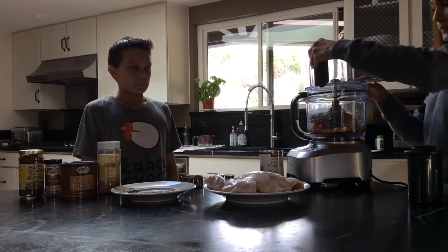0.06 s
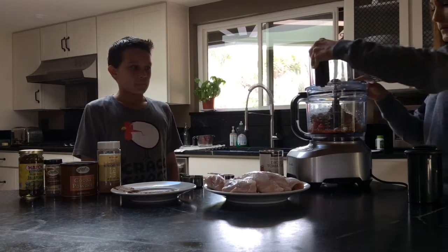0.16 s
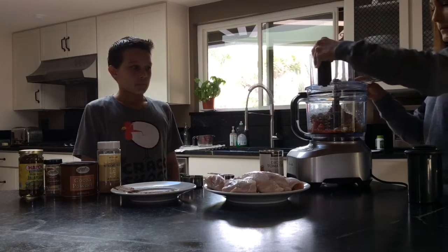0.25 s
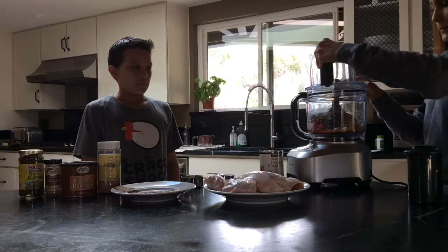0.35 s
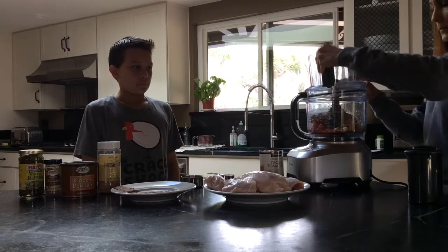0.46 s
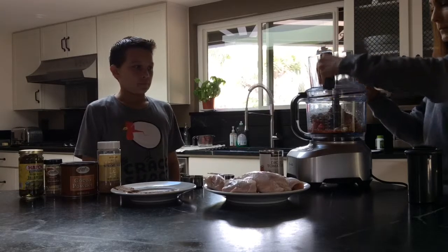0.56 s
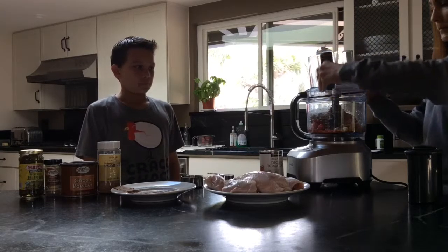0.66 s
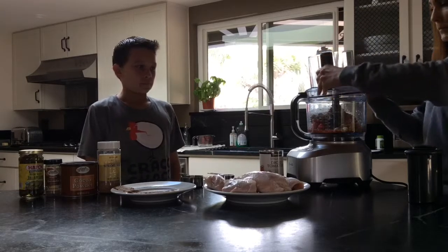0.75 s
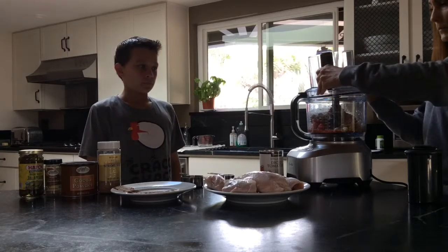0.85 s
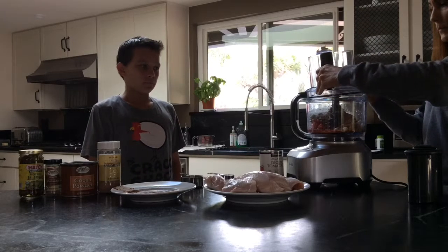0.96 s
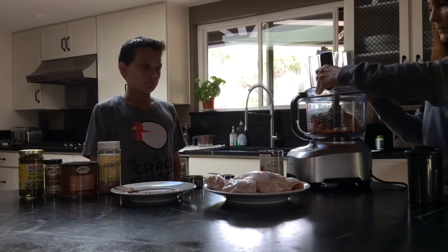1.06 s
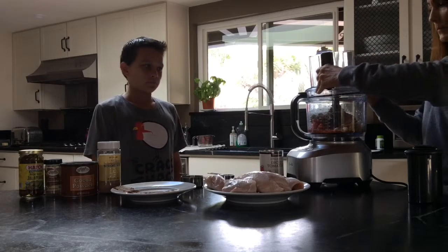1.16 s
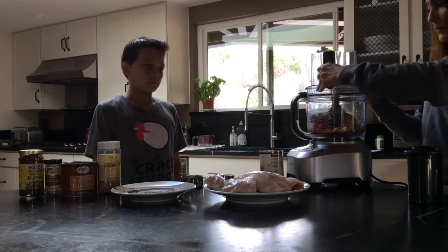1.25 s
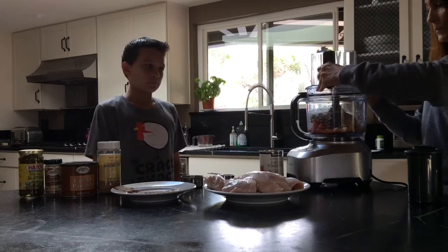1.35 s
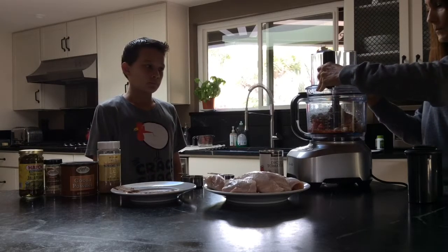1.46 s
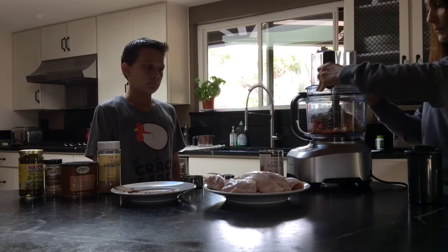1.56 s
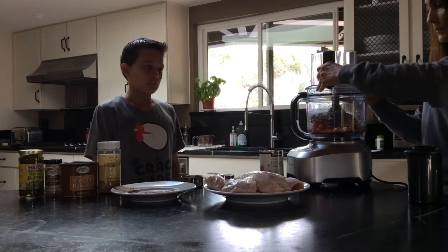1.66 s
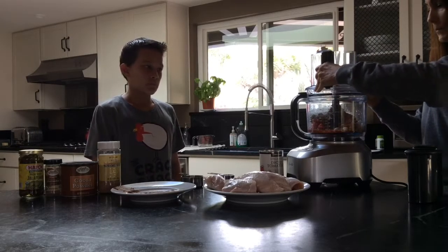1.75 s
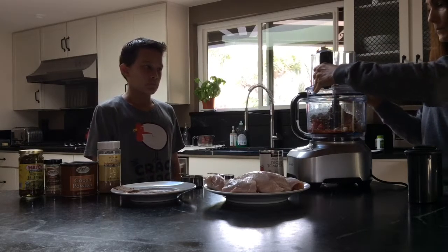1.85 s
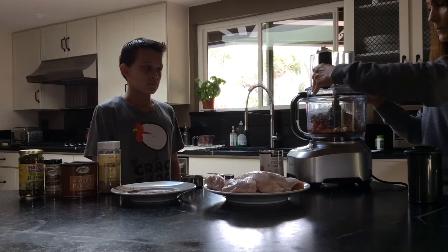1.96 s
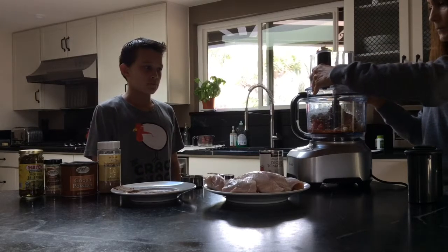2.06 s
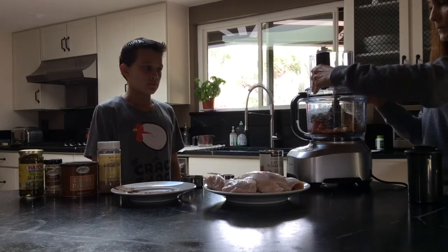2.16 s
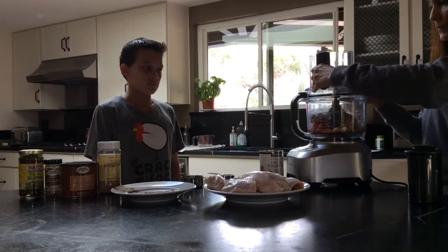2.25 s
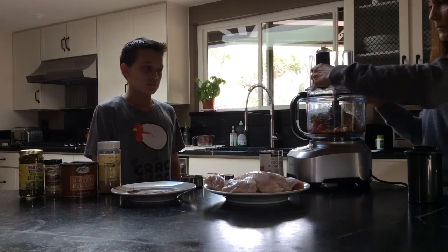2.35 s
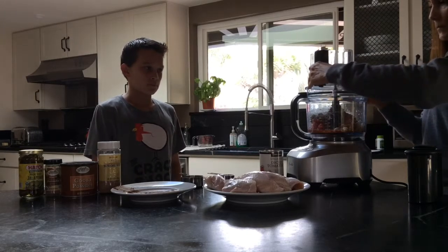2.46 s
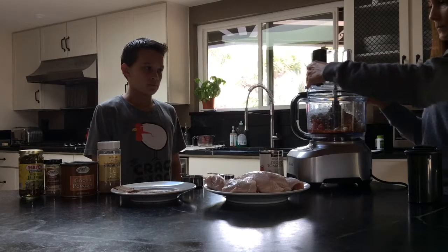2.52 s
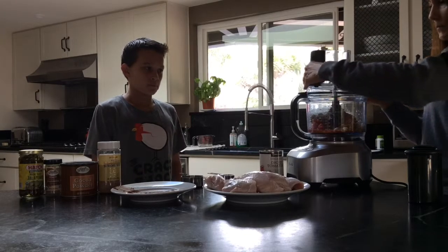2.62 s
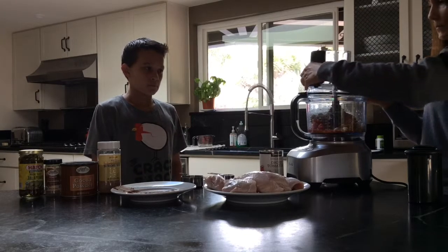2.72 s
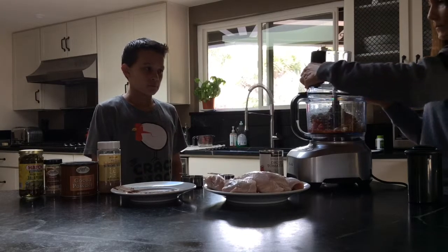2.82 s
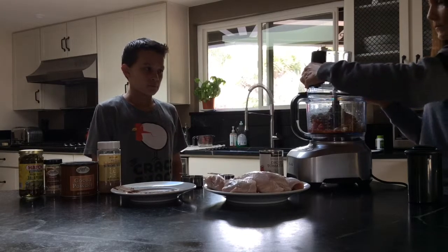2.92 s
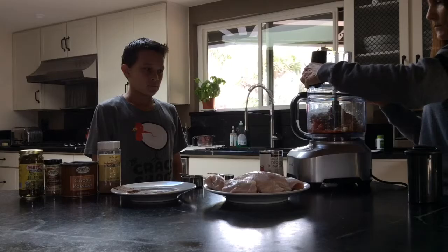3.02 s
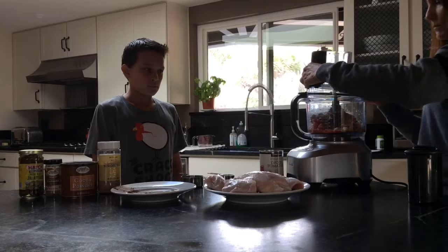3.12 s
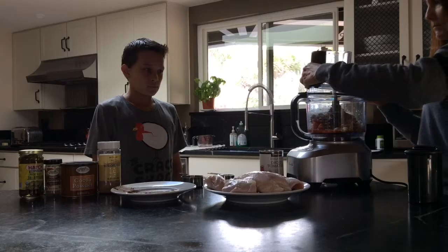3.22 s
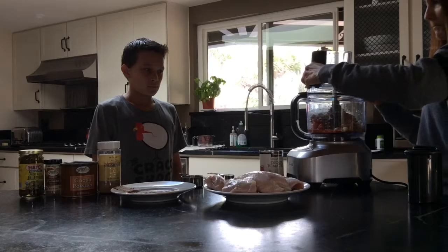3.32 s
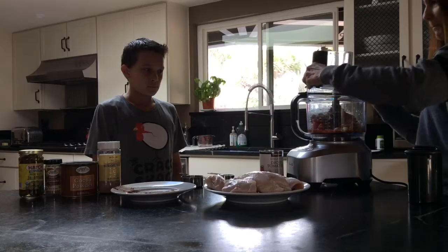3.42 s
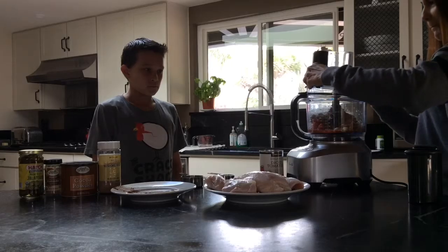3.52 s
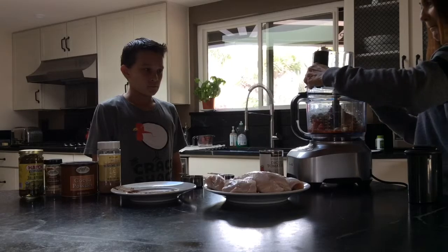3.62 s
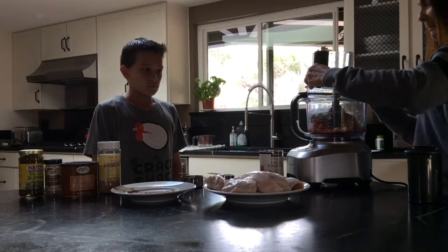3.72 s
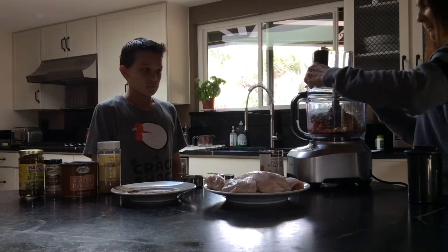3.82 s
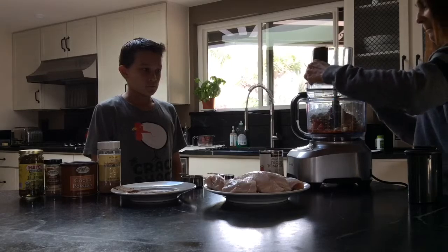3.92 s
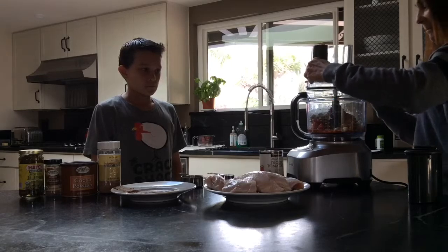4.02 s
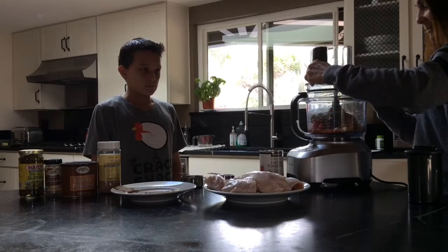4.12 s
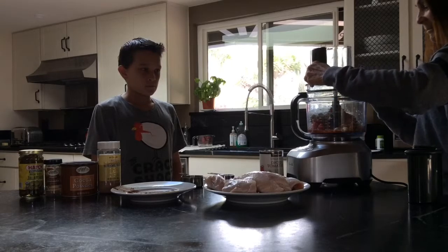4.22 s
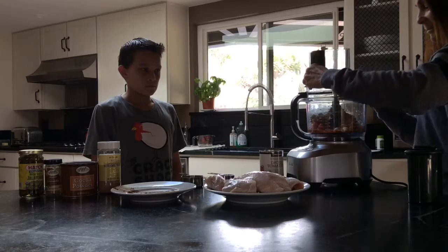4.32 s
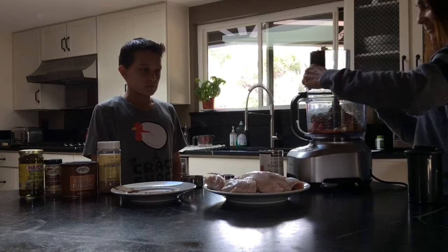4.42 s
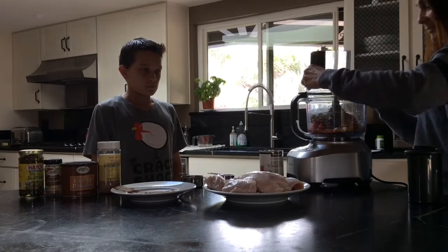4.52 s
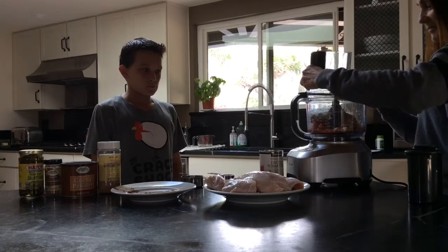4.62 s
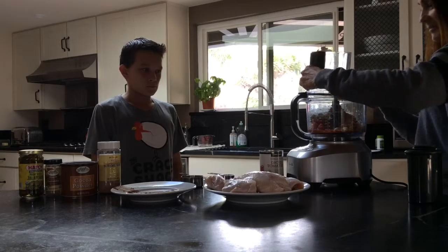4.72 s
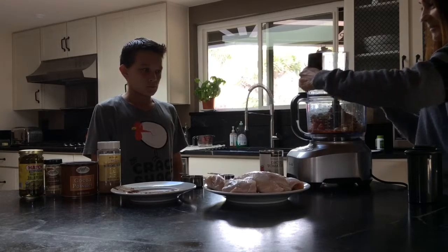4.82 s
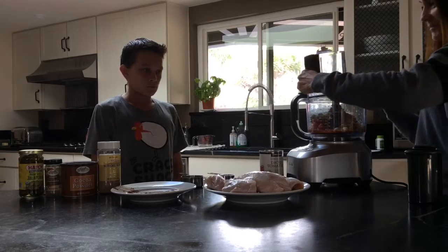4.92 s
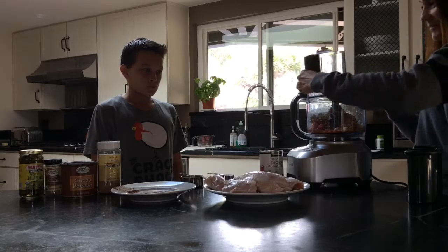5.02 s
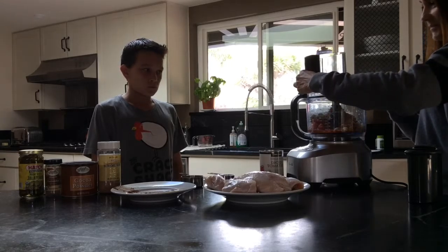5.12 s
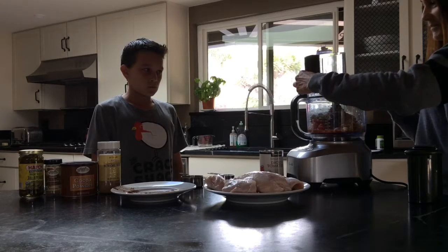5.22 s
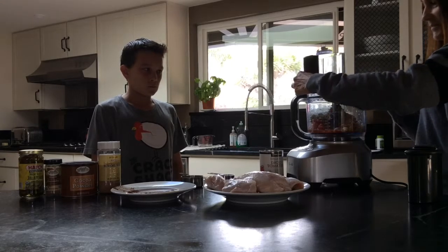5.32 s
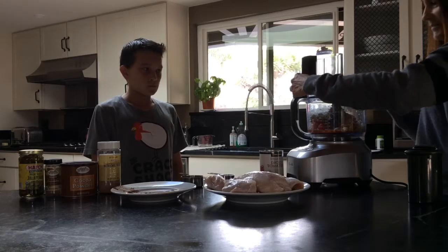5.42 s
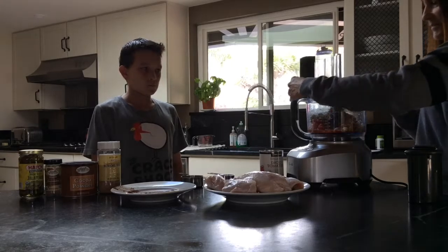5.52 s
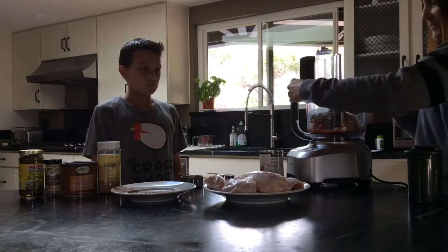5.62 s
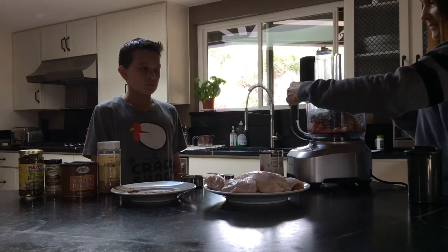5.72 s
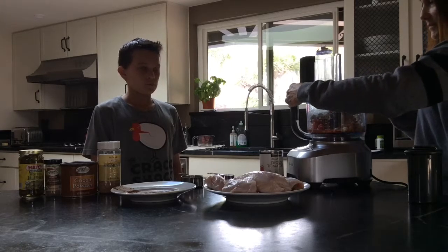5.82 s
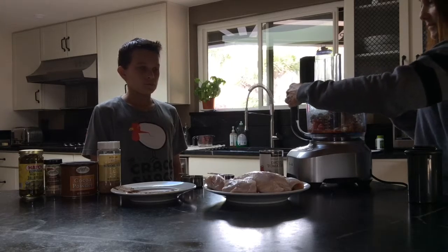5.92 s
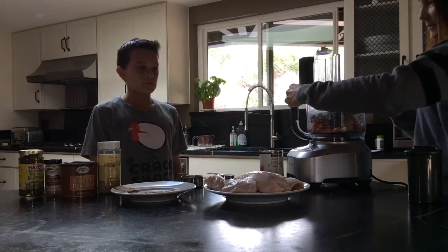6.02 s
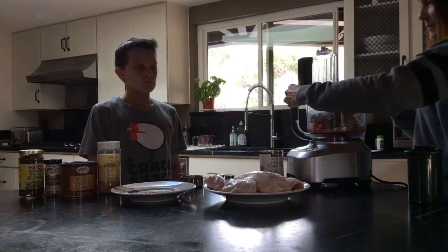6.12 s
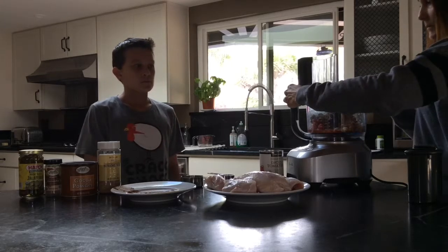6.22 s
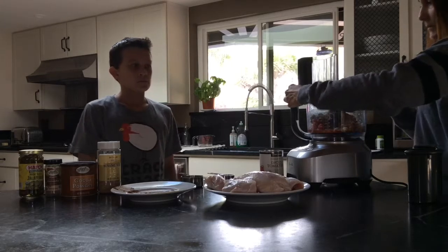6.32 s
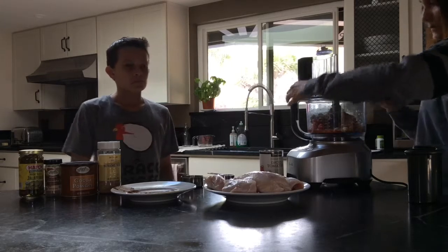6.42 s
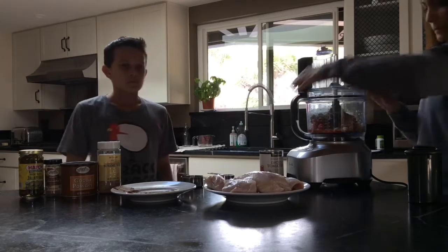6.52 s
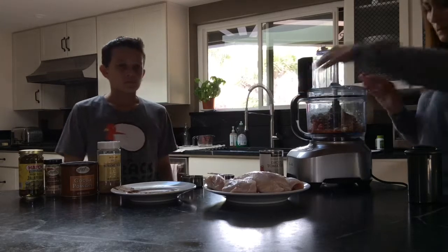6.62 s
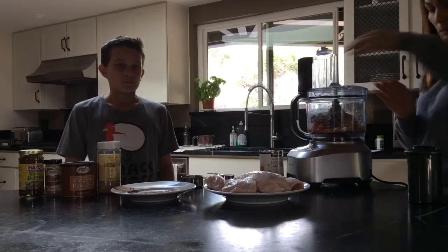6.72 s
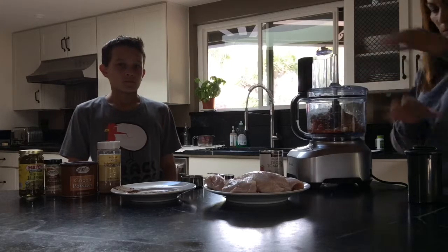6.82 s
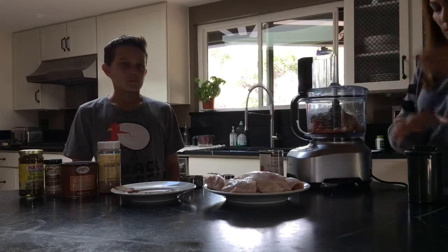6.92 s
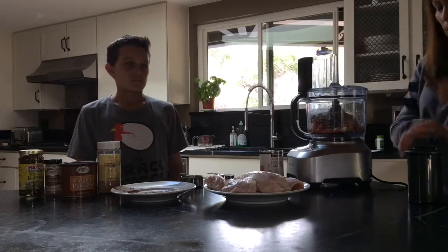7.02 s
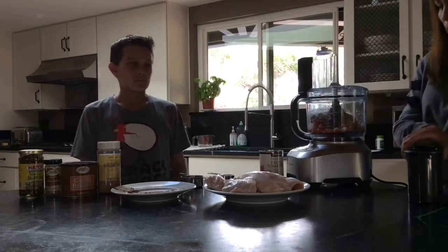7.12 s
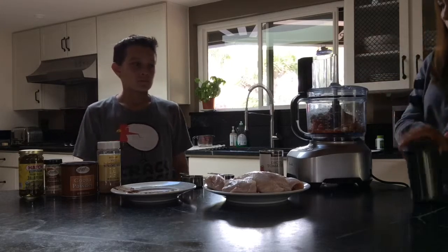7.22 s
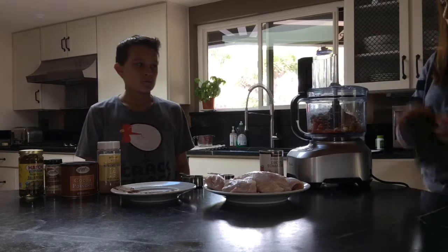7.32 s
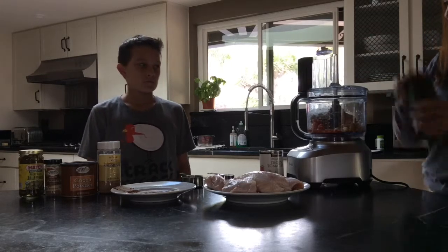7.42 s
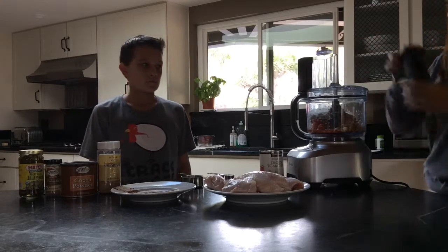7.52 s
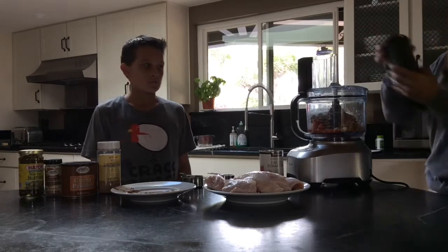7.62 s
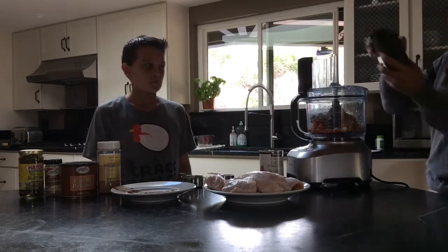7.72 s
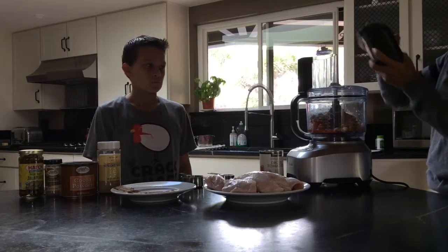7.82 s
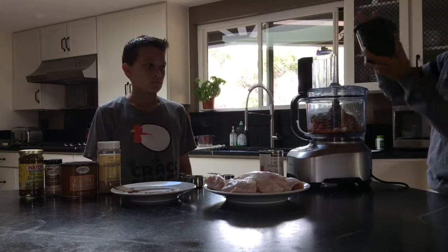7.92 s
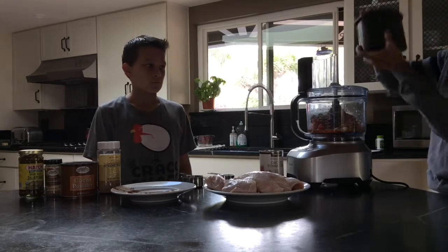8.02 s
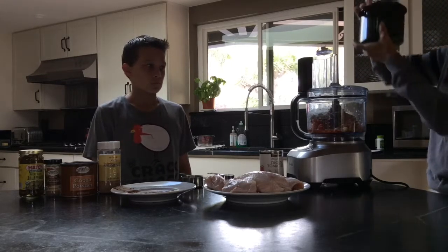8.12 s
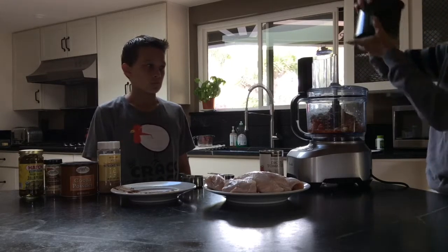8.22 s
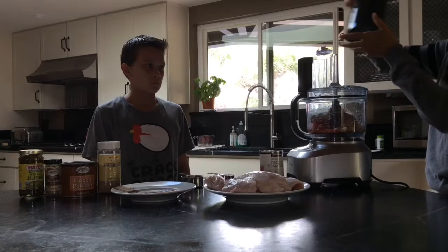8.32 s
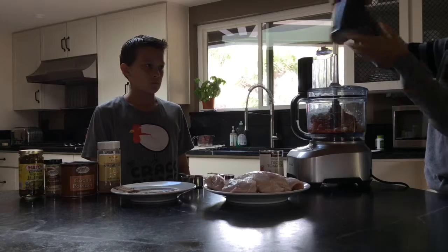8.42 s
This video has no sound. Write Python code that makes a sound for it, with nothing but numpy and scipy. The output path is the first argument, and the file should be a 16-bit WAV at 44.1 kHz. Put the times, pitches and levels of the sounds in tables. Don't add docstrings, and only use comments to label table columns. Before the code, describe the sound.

Hard plastic knocks and sharp clicks as a food processor lid and pusher are fitted, twisted and latched in a lively kitchen over faint low hum.

```python
import sys
import numpy as np
from scipy import signal
from scipy.fft import rfft, irfft
from scipy.io import wavfile
from scipy.ndimage import uniform_filter1d

SR = 44100
rng = np.random.default_rng(int(sys.argv[2]) if len(sys.argv) > 2 else 0)


def generate_wav(signal):
    frames = np.transpose(np.atleast_2d(signal))
    scaled = np.clip(frames, -1, 1) * 32767
    pcm = np.round(scaled).astype(np.int16)
    wavfile.write(sys.argv[1], SR, pcm)


def nominal_scale(level):
    x = np.asarray(level, float) / 20
    return 10 ** x


N = 373086

# pitch_hz, level_db
HUM_TONES = [(40, -82), (58.7, -70), (160, -75.5), (180, -73.5)]
# time_s, level_db
FAN_LEVEL = [(0, -80), (.25, -63), (3, -64.5), (7.3, -64.5), (7.6, -79), (8.46, -65)]
FAN_HZ = 80.2
# freq_hz, density_db_per_hz
AIR_SPECTRUM = [(20, -36), (45, -23), (90, -13), (170, -9), (230, -15), (420, -19.5), (830, -26.5),
                (1250, -32.5), (2600, -37), (6500, -38.5), (8300, -35.5), (9800, -36.5), (12500, -43.5),
                (15500, -49.5)]
# start_s, level_db, pitch_hz, t60_ms
BOWL_KNOCKS = [(0.026, -41, 436, 46), (0.656, -19, 277, 35), (1.009, -49, 268, 84), (1.288, -48.5, 251, 74),
               (1.793, -50.5, 268, 96), (1.895, -28, 463, 25), (1.907, -35, 347, 115),
               (2.455, -48, 276, 71), (2.492, -40, 270, 85), (2.678, -44.5, 302, 110),
               (2.708, -35.5, 305, 66), (2.72, -23.5, 308, 19), (3.604, -41, 263, 38),
               (3.947, -52, 283, 53), (4.058, -53, 356, 145), (4.482, -21, 339.5, 57),
               (4.481, -24.5, 332, 120), (4.81, -38.5, 255, 78), (4.96, -36, 279.4, 200),
               (4.972, -34, 275.5, 160), (5.021, -42, 250, 67), (5.22, -38.5, 334, 34),
               (5.437, -41.5, 340, 44), (5.556, -23.5, 239.3, 270), (5.564, -16.5, 237.4, 165),
               (5.586, -21.5, 250, 27), (5.618, -23, 214, 50), (5.673, -28, 235, 35),
               (6.191, -41.5, 225, 64), (6.247, -24.5, 350, 15)]
# pitch_ratio, level_db
SHELL_MODES = [(1.006, 4.5), (1.235, -7), (0.89, -19.5)]
# start_s, level_db, pitch_hz
TUBE_KNOCKS = [(0.6604, -17.5, 527), (0.656, -19.5, 823), (0.66, -31.5, 1440), (1.793, -48.5, 510),
               (1.895, -32, 694), (1.908, -34, 850), (2.491, -44.5, 537), (2.678, -48, 501),
               (2.708, -42, 497), (2.72, -32, 613), (3.234, -51, 514), (3.604, -47.5, 1050),
               (4.446, -52, 685), (4.481, -31, 620), (4.598, -58, 510), (4.81, -40.5, 562),
               (4.972, -36.5, 780), (5.021, -32, 1313), (5.22, -43, 818), (5.437, -43.5, 565),
               (5.51, -32, 843), (5.556, -25.5, 554), (5.564, -21.5, 893), (5.585, -33.5, 1125),
               (5.618, -31, 1037), (6.191, -49.5, 790), (6.247, -24, 588), (7.355, -24.5, 595),
               (7.611, -45, 496), (8.185, -43, 534)]
# pitch_ratio, level_db
TUBE_MODES = [(0.9445, 6), (1.356, 3.5), (0.775, -2), (1.72, -16)]
# centre_hz, t60_s, level_db
ROOM_BANDS = [(78.6, 0.58, 2.5), (120, 0.41, -9.5), (274, 0.42, 0), (493, 0.51, -2), (986, 0.51, 2.5),
              (2000, .5, -1), (4000, 0.49, 3), (8500, 0.44, 1), (14150, 0.37, 1)]
# delay_ms, level_db
ROOM_ECHOES = [(3.6, -3), (7.9, -11), (10.5, 1), (17, -10)]
# time_s, level_db
ROOM_SHARE = [(0, -13.5), (.8, -4.5), (1.2, -7), (1.9, -5.5), (2.5, -5.5), (2.901, -4.5), (3.6, -7.5),
              (4.1, 1), (4.5, -4.5), (4.8, -2.5), (5.0, -3), (5.6, -4), (6.2, -2), (7.35, -10.5),
              (7.6, -5.5), (8.2, -6.5)]
# start_s, level_db, pitch_hz
THUDS = [(.604, -48.5, 166), (.657, -57, 172), (0.701, -46.5, 89), (1.895, -38.5, 177), (2.493, -50, 162),
         (2.999, -55, 166), (5.51, -39.5, 187), (5.565, -32.5, 170), (5.6, -46, 106)]
THUD_T60_CYCLES = 9.8
# start_s, level_db, length_ms, centre_hz
RUBS = [(0.648, -64, 9.9, 2470), (7.346, -64.5, 12, 3000), (1.885, -64, 11, 2000), (2.6, -79, 270, 1400),
        (8.21, -73.5, 36, 3200), (4.02, -78.5, 50, 3000), (5.199, -74.5, 33, 5050), (6.176, -74, 58, 2330),
        (6.71, -77.5, 27, 6200), (7.57, -69, 54, 6700), (7.751, -69.5, 34, 4500), (7.867, -66.5, 30, 6740),
        (8.258, -76, 78, 5900), (8.348, -66.5, 36, 4000)]
# centre_hz, width_hz, gain_db
EDGE_MODES = [(1724, 650, 5), (3400, 650, 5), (5530, 2100, 4.5), (7950, 380, 6.5)]
CRACK_HZ = [600, 1800, 4200, 9000, 16000]
# start_s, body_db,
# hardness_db
EDGE_HITS = [(0.6567, -18, -2.5), (0.6594, -34, 2.5), (1.0096, -47, -19), (1.287, -46, -8),
             (1.667, -65, -28), (1.795, -47, -24), (1.8934, -27, 0.5), (2.492, -43, -2),
             (2.7085, -42.5, -0.5), (2.7227, -36.5, -6.5), (2.9099, -65.5, 13.5), (2.9985, -53, -0.5),
             (3.237, -53.5, -9), (3.6034, -49, -18), (3.9494, -58.5, -12), (4.0594, -45, 1),
             (4.4491, -46.5, -2.5), (4.485, -34, -6.5),
             (4.811, -43.5, -23), (4.957, -37, -17), (4.9623, -39, 1.5), (5.02, -30.5, -2),
                (5.2016, -49, -5.5), (5.219, -45.5, -3.5), (5.2503, -51, 3.5), (5.432, -56.5, -2),
                (5.5114, -43, -4.5), (5.5538, -36.5, -6.5), (5.5631, -16.5, -11), (5.5715, -28, -8.5),
                (5.5866, -27, -3.5), (5.6196, -26.5, -9), (6.044, -61.5, -5), (6.196, -37.5, -13),
                (7.3549, -36, 7.5), (7.3577, -27, -8), (8.1864, -44.5, -12)]
# start_s, body_db, hardness_db, chatter_ms
LATCH_HIT = (6.2406, -21.5, 1, 5.2)
CHATTER_MS = 5.54
TOP_DB, TOP_DB_PER_HARD_DB = -3.5, 1.34
# start_s, level_db
PUSHER_MODES = [(445, -9, 0.096), (818, -7, 0.027)]
PUSHER_HITS = [(1.895, -50)]
HUB_MODES = [(1145, -4, 0.21), (1196, -2, 0.14), (1215, -4, 0.36)]
HUB_HITS = [(2.579, -67), (3.603, -55.5), (4.062, -61), (4.81, -62), (5.021, -44), (5.221, -72)]
DOME_MODES = [(653, -10, .19), (830, -3, 0.38)]
DOME_HITS = [(4.062, -71.5), (5.22, -58)]
RIM_MODES = [(1010, -17, 0.045), (1840, -10, .07)]
RIM_HITS = [(4.958, -44), (5.021, -49.5)]
COLLAR_MODES = [(590, 4, 0.054), (800, -16, 0.063)]
COLLAR_HITS = [(5.565, -36), (5.62, -43)]
CATCH_MODES = [(510, -9.5, 0.034), (950, -6, 0.044), (1198, -4.5, 0.11), (1800, -8, 0.17), (5850, -1, 0.01),
               (7620, -4, 0.033)]
CATCH_HITS = [(6.243, -35.5)]
JAR_MODES = [(463, -1, 0.17), (620, 9.5, 0.093), (884, -11, 0.11), (1400, -2.5, 0.034)]
JAR_HITS = [(7.356, -31.5), (7.612, -64), (8.186, -54)]
# start_s, level_db
BLADE_JOLTS = [(2.7233, -60.5), (4.483, -58.5), (5.517, -65), (5.5621, -35.5)]
# pitch_hz, level_db, t60_s
BLADE_MODES = [(790, -19, .3), (1150, -16, 0.81), (1300, -16, 0.56), (1222, 3, 0.32), (1263, -6, 0.67),
               (1730, -9, 0.25)]
FLUTTER_DB = 2.5


def level(x, db):
    return x * nominal_scale(db) / np.sqrt(np.mean(x ** 2))


def band(x, hz, width_hz):
    return signal.lfilter(*signal.iirpeak(hz, hz / width_hz, SR), x)


def add(track, start_s, sound):
    i = int(start_s * SR)
    track[i:i + len(sound)] += sound[:N - i]


def ring(modes, push_ms, length_s):
    t = np.arange(int(length_s * SR)) / SR
    y = sum(nominal_scale(db) * np.sin(2 * np.pi * hz * t) * 1000. ** (-t / t60_s) for hz, db, t60_s in modes)
    y = y * (1 - np.exp(-t * 1000 / push_ms))
    return y / np.abs(y).max()


def walk(rate_hz):
    k = int(SR / rate_hz)
    steps = np.repeat(rng.standard_normal(N // k + 1), k)
    smooth = uniform_filter1d(uniform_filter1d(steps, k), k)
    return level(smooth[:N], 0)


def hum():
    t = np.arange(N) / SR
    out = np.zeros(N)
    for hz, db in [*HUM_TONES, (FAN_HZ, np.interp(t, *np.transpose(FAN_LEVEL)))]:
        gain = 2 ** .5 * nominal_scale(db + 0.65 * walk(4.8))
        pitch_hz = hz + 0.558 * walk(3)
        out += gain * np.sin(2 * np.pi * np.cumsum(pitch_hz) / SR)
    return out


def air():
    hz, db = np.transpose(AIR_SPECTRUM)
    bins_hz = np.arange(N // 2 + 1) * SR / N + 1
    colour = nominal_scale(np.interp(np.log(bins_hz), np.log(hz), db))
    noise = level(irfft(colour * rfft(rng.standard_normal(N)), N), -65.5)
    rumble = signal.sosfilt(signal.butter(2, 900, fs=SR, output="sos"), noise)
    return noise + rumble * (nominal_scale(0.88 * walk(3.07)) - 1)


def knocks():
    out = np.zeros(N)
    for s, db, hz, ms in BOWL_KNOCKS:
        modes = [(hz * ratio, g, ms / 1000) for ratio, g in SHELL_MODES]
        add(out, s, nominal_scale(db - 6.0) * ring(modes, 0.63, .5))
    for s, db, hz in TUBE_KNOCKS:
        modes = [(hz * ratio, g, .025) for ratio, g in TUBE_MODES]
        add(out, s, nominal_scale(db - 2.5) * ring(modes, 0.54, .1))
    return signal.sosfilt(signal.butter(3, 200, "high", fs=SR, output="sos"), out)


def tail(t, t60_s):
    fade = 1000. ** (-t / t60_s)
    y = rfft(rng.standard_normal(len(t)) * fade, 2 * len(t))
    y = y / np.sqrt(uniform_filter1d(np.abs(y) ** 2, size=int(35 * 2 * t[-1])))
    return irfft(y)[:len(t)] * np.sqrt(np.sum(fade ** 2))


def kitchen(x):
    t = np.arange(int(.9 * SR)) / SR
    response = np.zeros(len(t))
    for hz, t60_s, db in ROOM_BANDS:
        octave = signal.butter(2, [hz / 1.6, hz * 1.5], "band", fs=SR, output="sos")
        response += nominal_scale(db - 28.5) * signal.sosfilt(octave, tail(t, t60_s))
    response *= 1 - np.exp(-t / 0.00083)
    response *= 1 + .5 * np.exp(-t / 0.073)
    for ms, db in ROOM_ECHOES:
        response[int(ms * SR / 1000)] += nominal_scale(db)
    share_db = np.interp(np.arange(N) / SR, *np.transpose(ROOM_SHARE))
    return signal.fftconvolve(x * nominal_scale(share_db), response)[:N]


def thuds():
    out = np.zeros(N)
    for s, db, hz in THUDS:
        add(out, s, nominal_scale(db) * ring([(hz, 0, THUD_T60_CYCLES / hz)], 0.78, .8))
    return out


def rubs():
    out = np.zeros(N)
    half = 4096
    for s, db, ms, hz in RUBS:
        grains = rng.standard_normal(2 * half) ** 3
        shape = np.exp(-.5 * ((np.arange(2 * half) - half) / (ms * SR / 3000)) ** 2)
        add(out, s - half / SR, nominal_scale(db) * shape * level(band(grains, hz, 1.5 * hz), 0))
    return out


def impulse(db):
    cepstrum = irfft(db * np.log(10) / 20)
    cepstrum[1:512] *= 2
    cepstrum[513:] = 0
    return irfft(np.exp(rfft(cepstrum)))


def cracks():
    stop, chatter = np.zeros(N), np.zeros(N)
    t_ms = np.arange(1024) * 1000 / SR
    hz = np.arange(513) * SR / 1024 + 1
    lid_db = sum(db / (1 + (2 * (hz - f) / w) ** 2) for f, w, db in EDGE_MODES)
    hits = [(*row, CHATTER_MS) for row in EDGE_HITS] + [LATCH_HIT]
    for s, body, hard, ms in hits:
        top = TOP_DB + TOP_DB_PER_HARD_DB * hard
        points_db = body + np.array([3, 17, hard + 12, top + 8, top - 8])
        y = impulse(lid_db + np.interp(np.log(hz), np.log(CRACK_HZ), points_db))
        add(stop, s, y)
        bounces = 0.13 * rng.standard_normal(1024) * np.exp(-t_ms / ms)
        add(chatter, s, np.convolve(y, bounces) - .6 * np.pad(y, (0, 1023)))
    return stop, chatter


def parts():
    out = np.zeros(N)
    struck = [(PUSHER_MODES, PUSHER_HITS), (HUB_MODES, HUB_HITS), (DOME_MODES, DOME_HITS),
              (RIM_MODES, RIM_HITS), (COLLAR_MODES, COLLAR_HITS), (CATCH_MODES, CATCH_HITS),
              (JAR_MODES, JAR_HITS)]
    for modes, hits in struck:
        for s, db in hits:
            add(out, s, nominal_scale(db) * ring(modes, 0.26, .8))
    return out


def blade():
    out = np.zeros(N)
    for s, db in BLADE_JOLTS:
        modes = [(hz, g + 3.5 * rng.standard_normal(), t60_s) for hz, g, t60_s in BLADE_MODES]
        add(out, s, nominal_scale(db - 1.5) * ring(modes, 0.97, 0.87))
    return out * nominal_scale(FLUTTER_DB * walk(22))


def scene():
    stop, chatter = cracks()
    contacts = stop + knocks() + thuds() + rubs() + parts() + blade()
    return (contacts + chatter + kitchen(contacts) + hum() + air())[None]


def top_cut(x):
    return signal.sosfilt(signal.butter(12, 15830, fs=SR, output="sos"), x)


def record(dry):
    lowpass = signal.ellip(8, .2, 60, 15500, fs=SR, output="sos")
    mix = signal.sosfilt(lowpass, dry)
    return top_cut(mix)


dry = scene()
out = record(dry)
generate_wav(out)
```